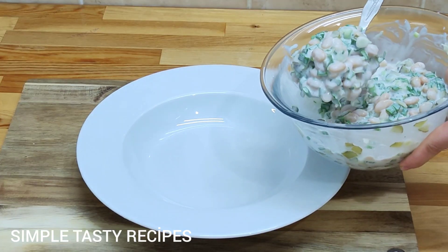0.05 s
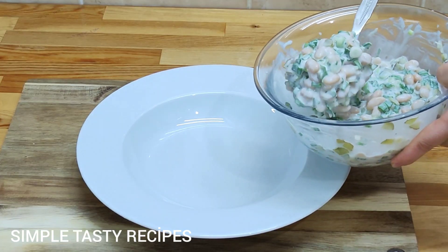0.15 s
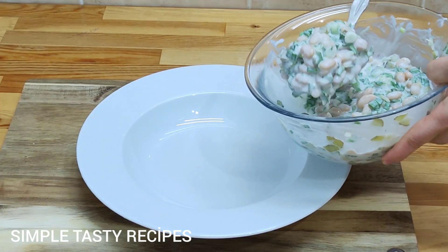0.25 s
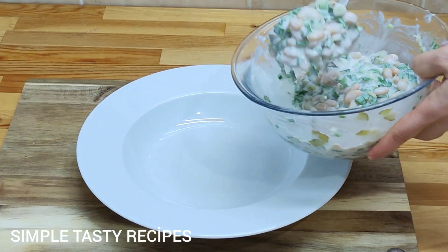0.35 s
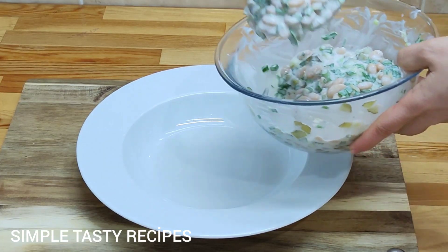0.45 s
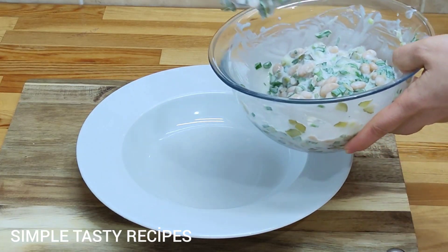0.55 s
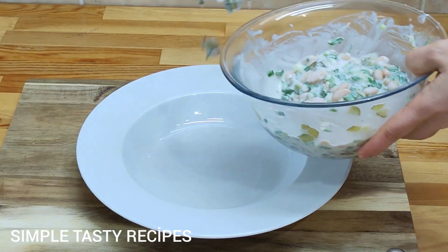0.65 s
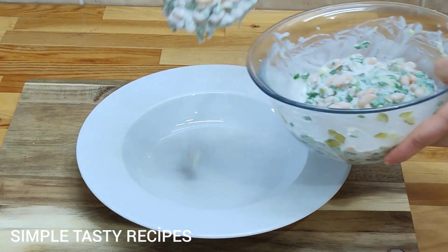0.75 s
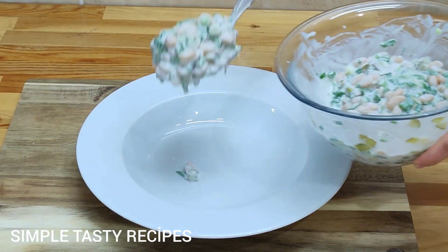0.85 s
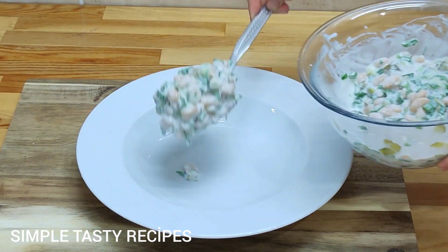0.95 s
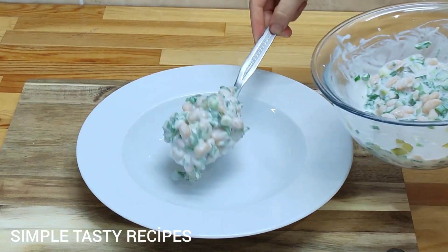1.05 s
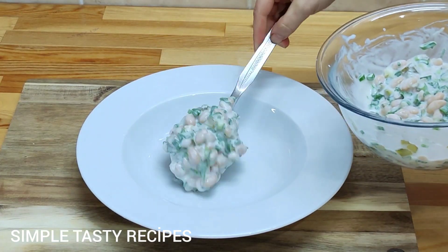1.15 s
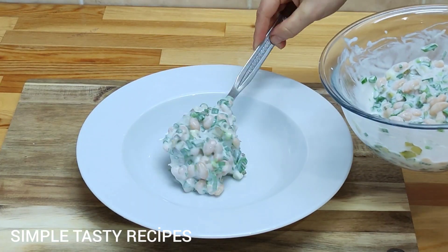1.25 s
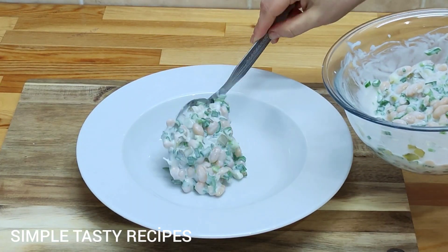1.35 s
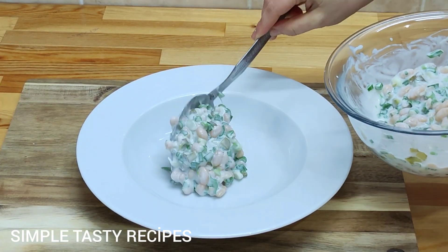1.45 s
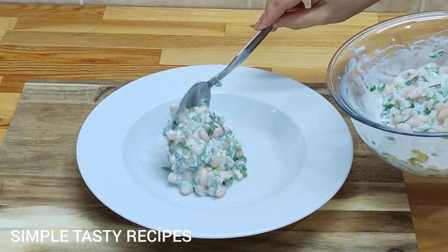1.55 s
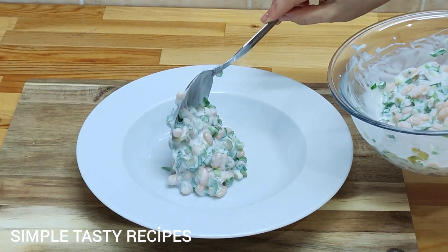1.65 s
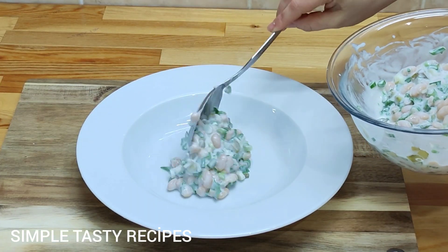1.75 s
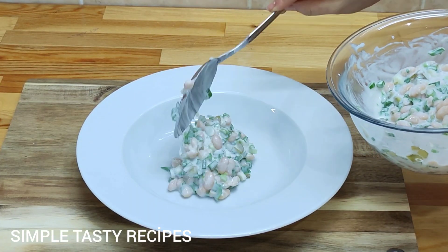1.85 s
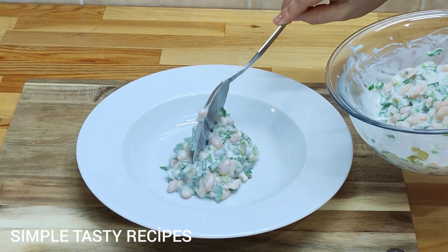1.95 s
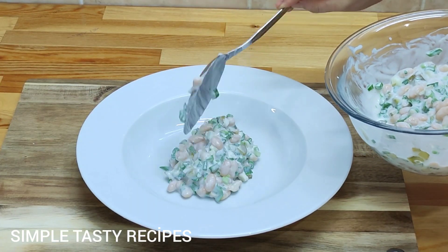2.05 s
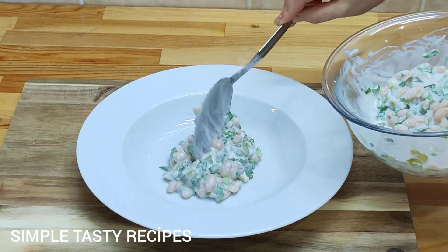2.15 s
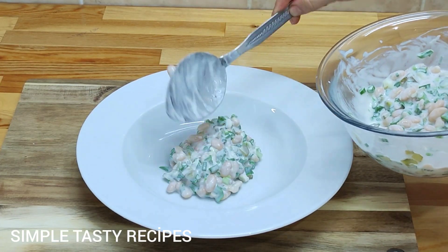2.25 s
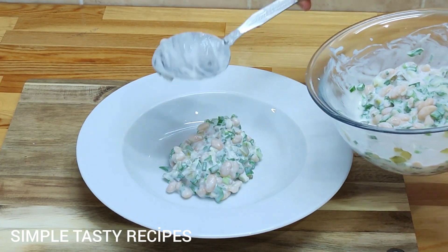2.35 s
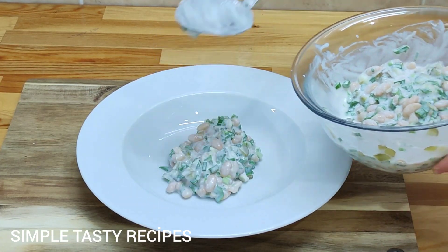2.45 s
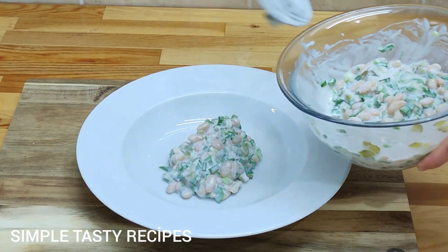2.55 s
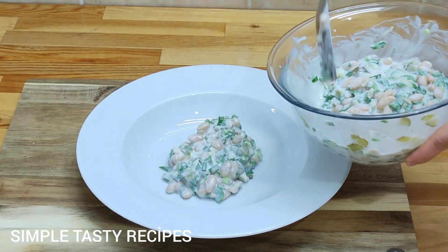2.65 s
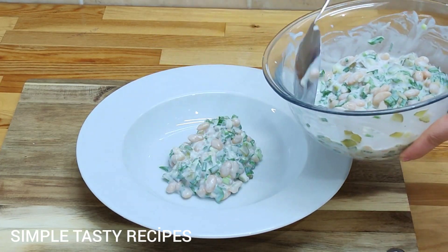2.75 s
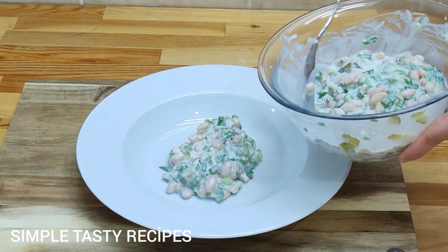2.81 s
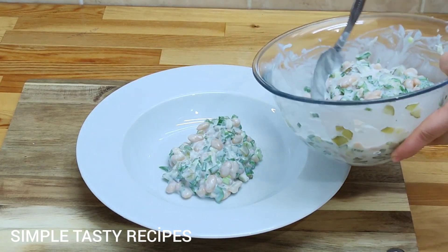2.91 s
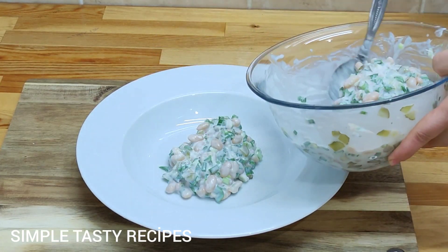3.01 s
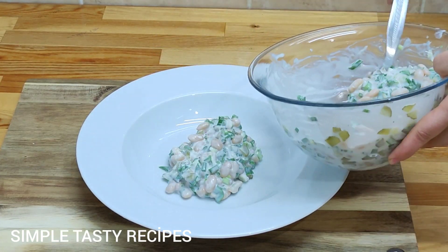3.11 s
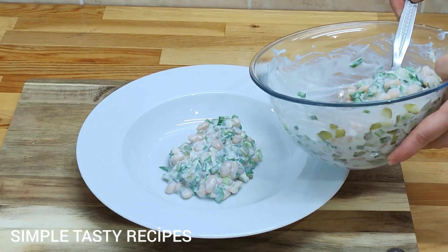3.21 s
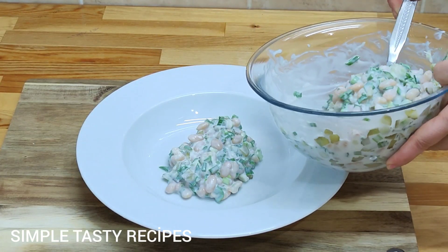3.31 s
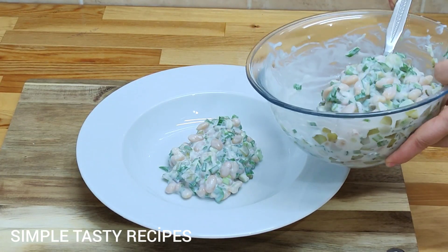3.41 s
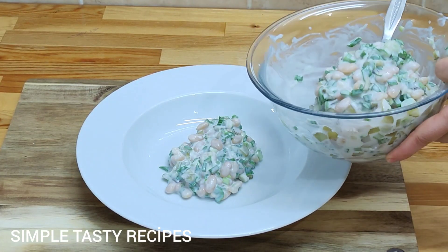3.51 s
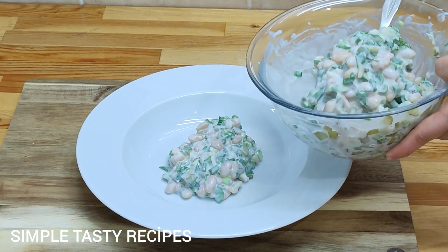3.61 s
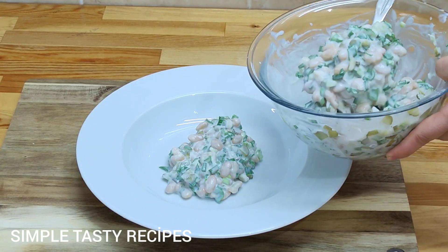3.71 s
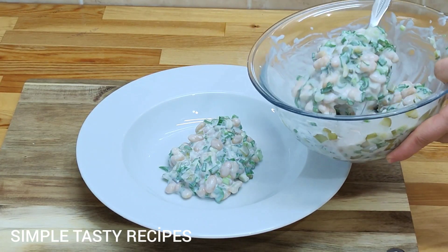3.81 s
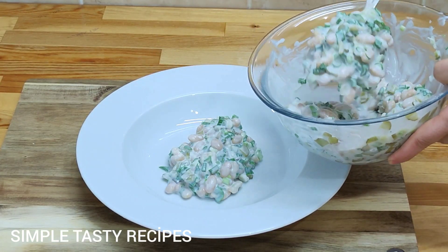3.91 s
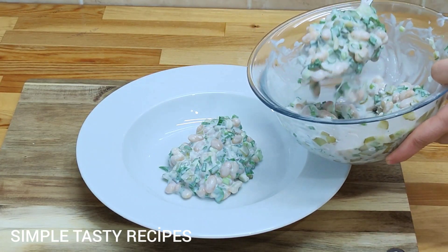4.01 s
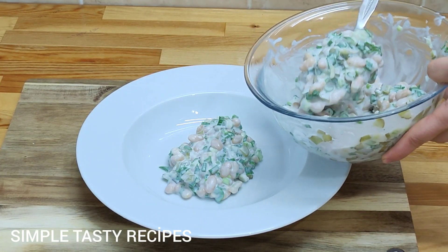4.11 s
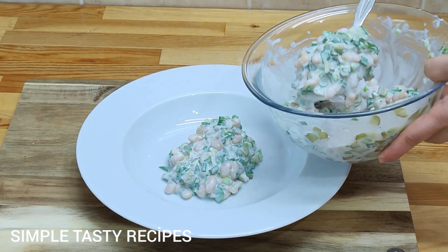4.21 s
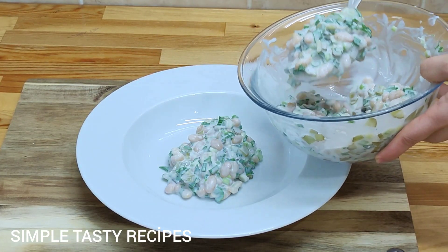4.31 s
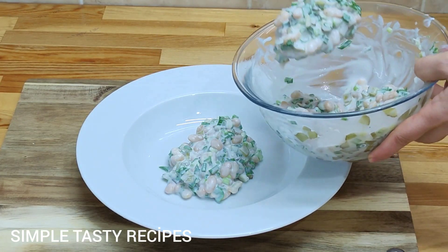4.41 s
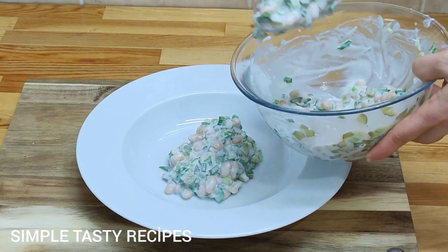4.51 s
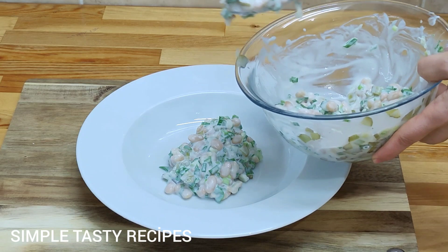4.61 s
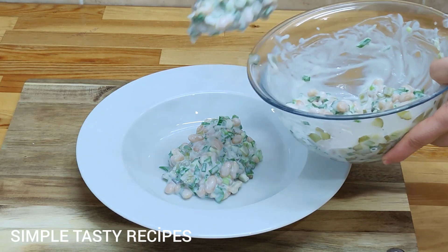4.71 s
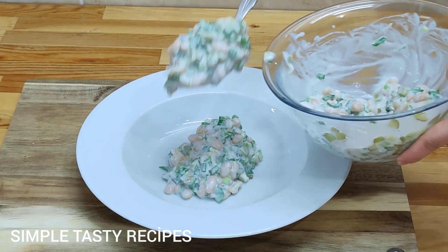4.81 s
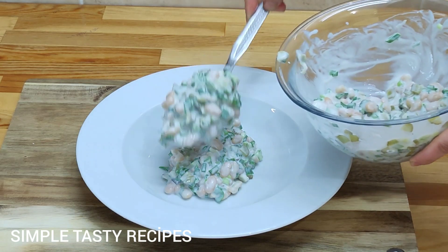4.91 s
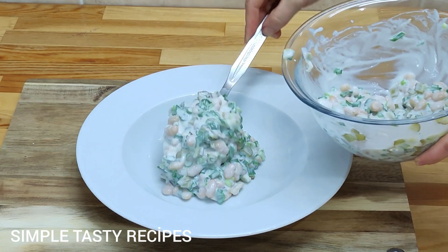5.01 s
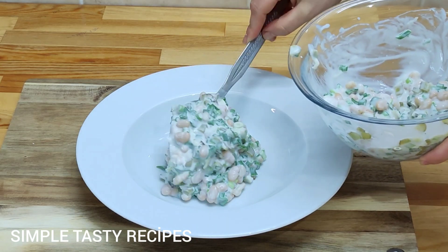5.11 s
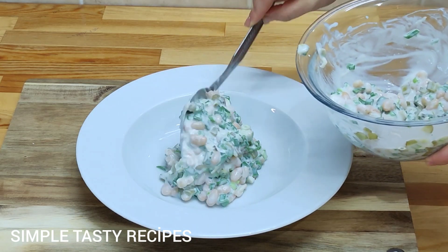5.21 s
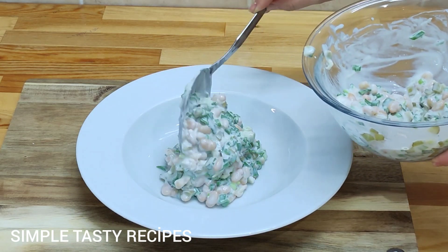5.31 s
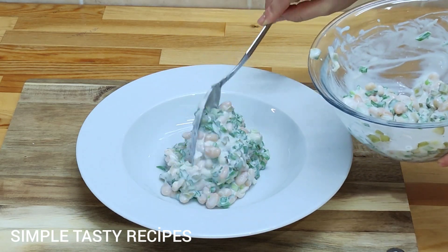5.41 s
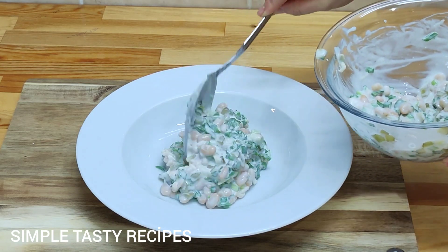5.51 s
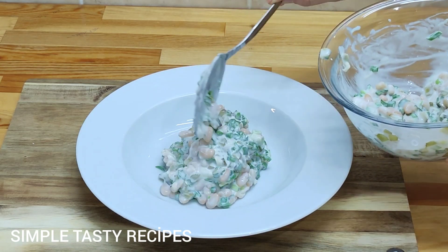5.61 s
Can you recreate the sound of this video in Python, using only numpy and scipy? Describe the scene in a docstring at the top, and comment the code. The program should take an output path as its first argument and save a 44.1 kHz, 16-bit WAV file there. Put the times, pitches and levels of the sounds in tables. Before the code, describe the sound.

Close stereo pickup of wet bean salad being served. First a muffled spoon knock on glass, two small china taps and faint squelches; after a quiet gap, a sharp ringing strike on the bare bowl dominates everything. Then come faint scraping, dull knocks through the salad and a soft squelchy drop on the plate. Hard kitchen surfaces give a short dense echo over low refrigerator hum.

```python
"""Small hard kitchen: a steel spoon serves wet bean salad from a hand-held glass bowl onto a china plate.
Spoon blows on the bowl mix short noisy clicks with damped sines; taps on the plate add a china ring.
The salad squelches softly in clusters of popping air pockets; the sliding spoon gives faint stick-slip grit.
Resonances, reflections and a dense tail answer; behind it a fridge hums in steady lines over shaped noise."""
import sys
import numpy as np
from scipy import signal
from scipy.fft import rfft, irfft
from scipy.io import wavfile

SR = 44100
rng = np.random.default_rng(int(sys.argv[2]) if len(sys.argv) > 2 else 0)


def dump_mix(stems):
    """Bounce the given channels to the path in sys.argv[1] as a 16-bit WAV at rate SR."""
    frames = np.atleast_2d(stems).T  # one column per channel
    limited = np.clip(frames, -1, 1)  # hard clip at full scale
    pcm = np.round(limited * 32767).astype(np.int16)
    wavfile.write(sys.argv[1], SR, pcm)


N = 249606
T = np.arange(SR // 2) / SR  # time axis of one click or ring, s

# Modes of the glass bowl, split in pairs by its uneven load.
# Each row: frequency in Hz, relative level in dB, t60 in s.
BOWL_MODES = np.transpose([[690, 1262, 1677, 1712, 3104, 3169, 3935, 4805, 4860, 6720, 8825, 10812, 12370, 13950, 14070],
              [-18, -10, 0, -5, 2, -5, -21, -12, -17, -28, -21, -17, -20, -14, -14],
              [.1, .16, .19, .14, .16, .12, .13, .13, .15, .2, .24, .24, .24, .12, .15]])
# Spectrum of the steel tick. Each row: frequency in Hz, relative density in dB per Hz.
TICK_SPECTRUM = [(2500, -43.5), (6300, -22.5), (7400, -1.5), (9000, -0.5), (11000, -0.5), (11900, -5),
                 (12400, -7.5), (13300, -14), (14000, -1.5), (15000, -19)]


def amp(db):
    """Converts dB to amplitude."""
    return 10 ** (np.asarray(db) / 20)


def unit(x):
    """Scales to an energy of one."""
    return x / np.sqrt(np.sum(x ** 2) + 1e-20)


def evened(x):
    """Scales to an rms of one."""
    return x / np.sqrt(np.mean(x ** 2) + 1e-20)


def read(points, hz):
    """Reads a table along a log-frequency axis."""
    f, value = np.transpose(points)
    return np.interp(np.log(hz + 1), np.log(f + 1), value)


def add(mix, start_s, sound):
    """Mixes a sound in at start_s."""
    part = mix[max(round(start_s * SR), 0):][:len(sound)]
    part += sound[:len(part)]


def snap(spectrum):
    """The shortest causal (minimum-phase) click that has this spectrum."""
    hz = abs(np.fft.fftfreq(len(T), 1 / SR))
    log_gain = np.log(amp(read(spectrum, hz)))
    min_phase = np.exp(np.conj(signal.hilbert(log_gain)))
    return unit(np.fft.ifft(min_phase).real)


def ring(modes):
    """Damped sines, each caught at a chance phase, under one soft onset."""
    onset_s = 0.00011
    swing = np.zeros(len(T))
    for hz, db, t60_s in modes:
        swing += amp(db - 60 * T / t60_s) * np.sin(2 * np.pi * (hz * T + rng.random()))
    return unit(swing * (1 - np.exp(-T / onset_s)) ** 2)


def band(x, hz, width_hz):
    """Passes a bell-shaped band around hz."""
    f = np.fft.rfftfreq(len(x), 1 / SR)
    bell = np.exp(-.5 * ((f - hz) / width_hz) ** 2)
    return evened(irfft(rfft(x) * bell, len(x)))


def contact(chatter_s):
    """A sharp push, then the steel chatters weakly on the surface for a few milliseconds."""
    force = unit(rng.standard_normal(len(T)) * np.exp(-T / max(chatter_s, 1 / SR)))
    force[0] = 1.3  # the push
    return unit(force)


def cushioned(ends, cushion):
    """Blends from the bare value to the fully cushioned one."""
    bare, full = ends
    return bare + (full - bare) * np.clip(cushion, 0, 1)


def diffuse(n):
    """Noise from all directions at the two microphones: most alike in the bass."""
    # Each row: frequency in Hz, left-right correlation.
    likeness = [(60, 0.93), (150, 0.86), (380, 0.71), (940, -0.12), (2350, 0.094), (5880, 0.062),
                (14700, -0.47)]
    left, other = rfft(rng.standard_normal((2, n)))
    same = np.clip(read(likeness, np.fft.rfftfreq(n, 1 / SR)), -1, 1)
    right = same * left + np.sqrt(1 - same ** 2) * other
    return irfft(np.array([left, right]), n)


def air(level_db=-64):
    """Soft machine rumble and hiss, as spectrally shaped diffuse noise."""
    # Room air. Each row: frequency in Hz, relative density in dB per Hz.
    air_spectrum = [(20, -2), (45, -5.5), (65, -14.5), (95, -5.5), (140, 2), (220, -2), (350, -4),
                    (520, -12), (800, -12.5), (1300, -21), (2500, -27.5), (4500, -33), (7000, -42.5),
                    (12000, -30), (14500, -33)]
    gain = amp(read(air_spectrum, np.fft.rfftfreq(N, 1 / SR)))
    return amp(level_db) * evened(irfft(rfft(diffuse(N)) * gain, N))


def fridge(waver=.1, knot_s=.07):
    """Mains and compressor lines, each wavering a little in level and phase."""
    # Multiples of the motor's turning and of the mains. Each row: frequency in Hz, level in dB.
    hum_lines = np.transpose([[100, 146, 196.3, 200, 245.4, 294.5, 343.6, 392.7, 441.8, 490.9],
                 [-76, -74, -73, -60.5, -77, -65.5, -76, -84, -85, -80]])
    t, out = np.arange(N) / SR, np.zeros(N)
    knots = np.arange(0, N / SR + 1, knot_s)
    for hz, db in hum_lines:
        swell = waver * np.interp(t, knots, rng.standard_normal(len(knots)))
        drift_rad = waver * np.interp(t, knots, rng.standard_normal(len(knots)))
        tone = np.sin(2 * np.pi * (hz * t + rng.random()) + drift_rad)
        out += np.sqrt(2) * amp(db) * (1 + swell) * tone
    return out


def kitchen(x, tail_db, build_s=0.00063, nook_db=2, nook_t60_s=0.11):
    """Direct sound, near reflections, and a dense tail that dies band by band."""
    # Each row: frequency in Hz, t60 in s.
    room_t60 = [(200, 1), (600, .48), (1400, 0.5), (3500, 0.52), (9000, 0.37), (14000, 0.11)]
    # Board, worktop and wall. Each row: left delay in s, right delay in s, level in dB.
    reflections = [(.00113, .00113, -2), (.0029, .003, -1.5), (.0068, .0074, -12), (.0122, .0152, -9.5),
                   (.0282, .045, -7)]
    hz, t, z = signal.stft(diffuse(len(T)), SR, nperseg=256)
    # the nook above the worktop empties quickly, the whole room more slowly
    nook = amp(nook_db - 60 * t / nook_t60_s)
    room = amp(-60 * t / read(room_t60, hz)[:, None])
    tails = signal.istft(z * (nook + room), SR, nperseg=256)[1][:, :len(T)]
    stereo = np.broadcast_to(x, (2, N))
    out = []
    for side, tail in enumerate(tails):
        response = amp(tail_db) * unit(tail * (1 - np.exp(-T / build_s)))
        response[2 * (1 - side)] += 1  # the left microphone is a little farther away
        for *delays_s, db in reflections:
            add(response, delays_s[side], amp([db]))
        out.append(signal.fftconvolve(stereo[side], response)[:N])
    return np.array(out)


def slides(sing_width_hz=18, grain=0.79, pressure_db=-3.5, glass_db=-7, sing_db=-88):
    """Fine stick-slip grit that sets the bowl ringing, with one faint note singing under the stroke."""
    # Spoon on glass or china. Each row: start in s, length in s, grit level in dB, singing pitch in Hz.
    strokes = [(0.038, 0.063, -78, 1720), (0.362, 0.16, -94, 1724), (0.687, 0.14, -95, 2154),
               (3.095, 0.097, -60.5, 3080), (3.367, 0.19, -76, 1719), (4.12, 0.097, -80, 1690)]
    # Each row: frequency in Hz, relative density in dB per Hz.
    grit_spectrum = [(300, -15), (1200, -3.5), (2200, -12), (3100, 1), (4400, -9.5), (4900, -4.5),
                     (6000, -18.5), (7700, -7), (12500, -16.5), (14000, -18)]
    out = np.zeros(N)
    glass = unit(np.gradient(ring(BOWL_MODES)))  # tiny slips favour the high modes
    body = snap(grit_spectrum) + amp(glass_db) * glass
    for start_s, length_s, grit_db, hz in strokes:
        n = round(length_s * SR)
        pressure = amp(pressure_db) * np.sqrt(np.hanning(n))
        slips = evened(rng.standard_normal(n) * np.exp(grain * rng.standard_normal(n)))
        add(out, start_s, amp(grit_db) * signal.fftconvolve(pressure * slips, body))
        add(out, start_s, amp(sing_db) * pressure * band(slips, hz, sing_width_hz))
    return out


def pops(length_s, hz, pops_per_s=900, spread=.3, decay_const=2.5):
    """A cluster of tiny pops around one pitch."""
    t = T[:2048]
    cluster = np.zeros(round(length_s * SR) + len(t))
    for when, pitch, size in rng.random((int(length_s * pops_per_s) + 1, 3)):
        f = hz * np.exp(spread * (2 * pitch - 1))
        # the thick dressing softens each start
        swell = (1 - np.exp(-f * t)) * np.exp(-f * t / decay_const)
        add(cluster, when * length_s, size ** 2 * swell * np.sin(2 * np.pi * f * t))
    return np.sqrt(length_s * SR) * unit(cluster)


def salad(level_db=-3, spatter_hz=1120, spatter_db=-10):
    """Squelches burst air pockets of similar size in the dressing; two spoon clicks share the method."""
    # Salad pressed, pulled and dropped, and two small high spoon clicks (1.363 s, 5.045 s).
    # Each row: start in s, length in s, level in dB before level_db, main pop pitch in Hz.
    squelches = [(0.857, 0.047, -67.5, 367), (1.248, 0.023, -74.5, 950), (1.363, 0.016, -74.5, 3410),
                 (1.398, .06, -70, 384), (2.188, 0.062, -79.5, 430), (3.13, 0.018, -58.5, 1270),
                 (3.434, 0.1346, -77, 692), (5.044, 0.014, -67.5, 813.2), (5.045, 0.01044, -73, 3534),
                 (5.207, 0.063, -65.5, 434), (5.371, 0.051, -80.5, 956)]
    out = np.zeros(N)
    for start_s, length_s, db, hz in squelches:
        # main pops with a fainter spatter
        cluster = pops(length_s, hz) + amp(spatter_db) * pops(length_s, spatter_hz)
        add(out, start_s, amp(db + level_db) * cluster)
    return out


def plate(chatter_s=0.0011, tick_db=3, china_db=2.5, served_s=1.2, salad_damps_db=14):
    """Light taps that leave a short china ring, weaker once salad lies on the plate."""
    # Spoon and crockery. Each row: start in s, strength in dB, share of steel tick 0-1.
    taps = [(0.85, -36, 1), (1.392, -39.5, 0.01), (2.1982, -55, 0.7), (5.0463, -55, 0.43)]
    # Each row: frequency in Hz, relative level in dB, t60 in s.
    china_modes = np.transpose([[1050, 2449, 2859, 3040, 4484, 5900, 6740, 7704],
                   [-12, 0, 0, -6, -4, -14, -10, -8], [.06, .1, .08, .06, .09, .08, .1, .1]])
    # Each row: frequency in Hz, relative density in dB per Hz.
    click_spectrum = [(100, -28), (380, 1), (650, 0), (1000, -1.5), (1800, -6), (2400, 0), (2900, -1.5),
                      (3700, -4), (5500, -8), (7000, -12.5), (14000, -24.5)]
    out = np.zeros(N)
    china, click = ring(china_modes), snap(click_spectrum)
    steel = amp(tick_db) * snap(TICK_SPECTRUM)
    for start_s, db, tick_share in taps:
        ring_db = db + china_db - salad_damps_db * (start_s > served_s)
        add(out, start_s, amp(ring_db) * china)
        tap = signal.fftconvolve(contact(chatter_s), click + tick_share * steel)
        add(out, start_s, amp(db) * tap)
    return out


def bowl(room_modes_db=-6.0, clank_body_db=2.5, ring_db=-1.0, clank_wet_db=0, ring_wet_db=-5):
    """Each blow mixes the ring of glass and room with a fast-dying knock, clank, tick and skid."""
    # Each row: start in s, strength in dB, cushion of salad 0-1, glancing 0-1, left minus right in dB.
    spoon_blows = [(0.2146, -29.5, 0.88, .09, 0.5), (2.8375, -27.5, .55, 0.96, 1), (2.9121, 1, 0, 0.03, 0),
                   (3.1085, -35.5, 0.4, .07, 1), (3.833, -28.5, 0.96, 0.07, 1.5),
                   (4.1976, -20.5, 0.95, 0.04, 1.5), (4.4880, -64.5, 1, .4, -2.5),
                   (4.7920, -55.5, .7, 0.03, -0.5)]
    # Spectra of the fast-dying parts. Each row: frequency in Hz, relative density in dB per Hz.
    knock_spectrum = [(70, -21), (180, -6), (400, -9.5), (680, -2), (830, -2), (970, -1), (1150, -8),
                      (1500, -3.5), (2400, -16), (3500, -13), (4400, -18), (4900, -4.5), (5600, -15.5),
                      (6300, -17), (9000, -35.5)]
    clank_spectrum = [(60, -35), (180, -28.5), (500, -15.5), (830, -15.5), (970, -25.5), (1180, 0),
                      (2100, -4.5), (2350, -17), (2550, -7), (2870, -7.5), (3450, -0.5), (3800, -15),
                      (4450, -23), (4900, -18.5), (5800, -39), (12000, -42)]
    skid_spectrum = [(100, -24.5), (560, -7.5), (1000, -4), (2200, -4.5), (2800, 4.5), (3400, 6), (4100, 0),
                     (5500, -1.5), (6800, -5), (10000, -2), (14000, -0.5)]
    # Close-packed room resonances set off by a hard blow, and modes of the hollow bump.
    # Each row: frequency in Hz, relative level in dB, t60 in s.
    room_modes = np.transpose([[1173, 1336, 1775, 1955, 2091, 2143, 2431, 2530, 3309, 3418, 3526, 8030, 9110, 11209],
                  [-6, -4, -2, -2, -4, -5, -9, -7, -1, -1, -2, -15, -14, -12],
                  [.15, .15, .16, .18, .17, .17, .18, .15, .18, .16, .15, .2, .18, .2]])
    bump_modes = [(587, -1.5, .09), (1337, -1.5, .12), (2960, -0.5, 0.046), (4100, 0, .08)]
    # salad between steel and glass trades the clank for a dull knock and a longer chatter:
    # (on bare glass, fully cushioned)
    knock_ends_db, clank_ends_db, tick_ends_db = (-28, -2.5), (-4, -14.5), (-14, -1.5)
    chatter_ends_s = (.0012, .003)
    skid_db, bump_db = 13, 3.5  # at a fully glancing blow
    muffle_hz, muffle_db = 2500, 2  # cut of the glass modes above this pitch under a full cushion

    blows, clanks, rings = np.zeros((3, 2, N))
    knock_snap, clank_snap = snap(knock_spectrum), snap(clank_spectrum)
    tick_snap, skid_snap = snap(TICK_SPECTRUM), snap(skid_spectrum)
    for start_s, db, cushion, glancing, pan_db in spoon_blows:
        clank_db = cushioned(clank_ends_db, cushion)
        knock = amp(cushioned(knock_ends_db, cushion)) * knock_snap
        clank = amp(clank_db + clank_body_db) * clank_snap
        tick = amp(cushioned(tick_ends_db, cushion)) * tick_snap
        skid = glancing * amp(skid_db) * skid_snap
        force = contact(cushioned(chatter_ends_s, cushion))
        blow = signal.fftconvolve(force, knock + tick + skid)[:len(T)]

        muffled_modes = [(hz, level_db - muffle_db * cushion * (hz > muffle_hz), t60_s)
                         for hz, level_db, t60_s in BOWL_MODES]
        glass = amp(ring_db) * ring(muffled_modes)
        room = amp(clank_db + room_modes_db) * ring(room_modes)
        bump = glancing * amp(bump_db) * ring(bump_modes)
        ringing = glass + room + bump

        for side, gain in enumerate(amp([db + pan_db / 2, db - pan_db / 2])):
            add(blows[side], start_s, gain * blow)
            add(clanks[side], start_s, gain * clank)
            add(rings[side], start_s, gain * ringing)
    wet_blows = kitchen(blows, tail_db=9.0)
    wet_clanks = kitchen(clanks, tail_db=clank_wet_db)
    return wet_blows + wet_clanks + kitchen(rings, tail_db=ring_wet_db)


def scene():
    """Serving sounds in the room, over a background that leans slightly left."""
    lean = amp([[.2], [-.2]])
    background = lean * (fridge() + air())
    serving = kitchen(plate() + salad() + slides(), tail_db=6.0)
    return bowl() + serving + background


def record(dry, low_cut_hz=85, edge_hz=14350):
    """The recorder's bass cut and band limit."""
    high_pass = signal.butter(2, low_cut_hz, "highpass", fs=SR, output="sos")
    thin = signal.sosfilt(high_pass, dry)
    low_pass = signal.firwin(511, edge_hz, window=("kaiser", 9), fs=SR)
    return signal.oaconvolve(thin, low_pass[None], "same")


dry = scene()
out = record(dry)
dump_mix(out)
```